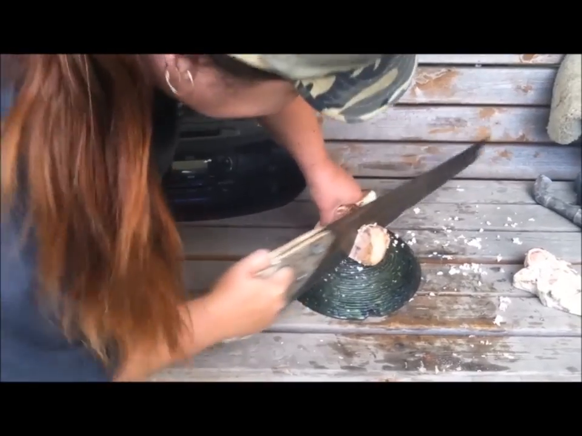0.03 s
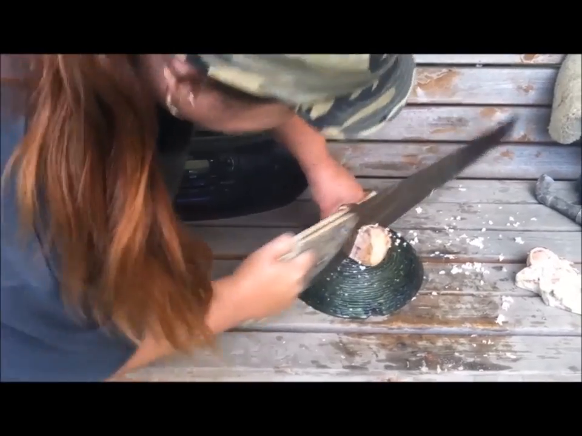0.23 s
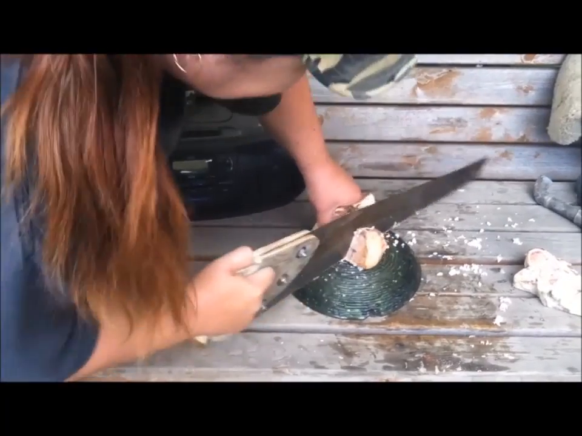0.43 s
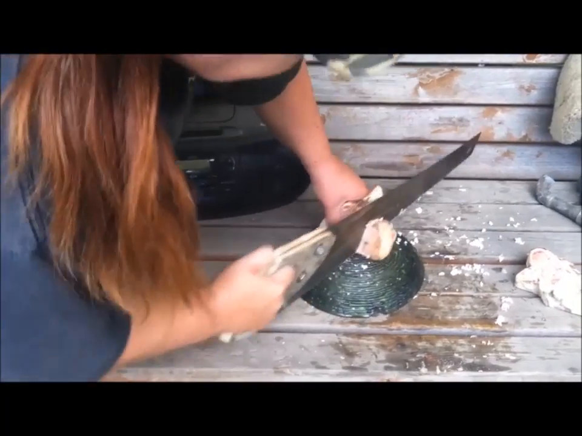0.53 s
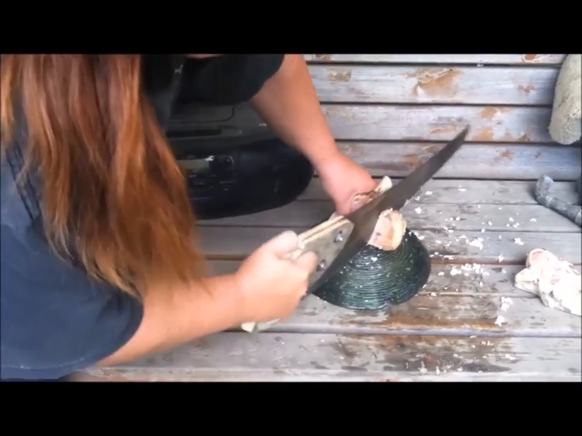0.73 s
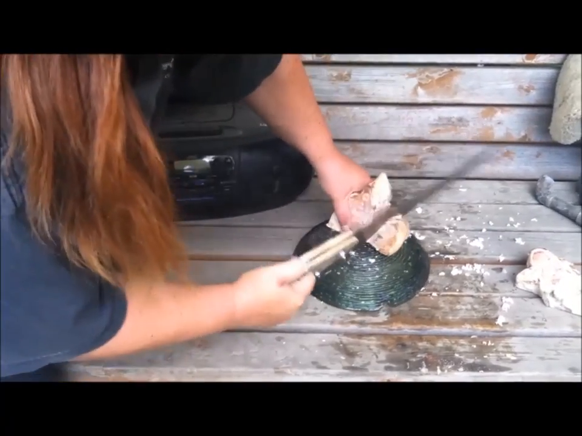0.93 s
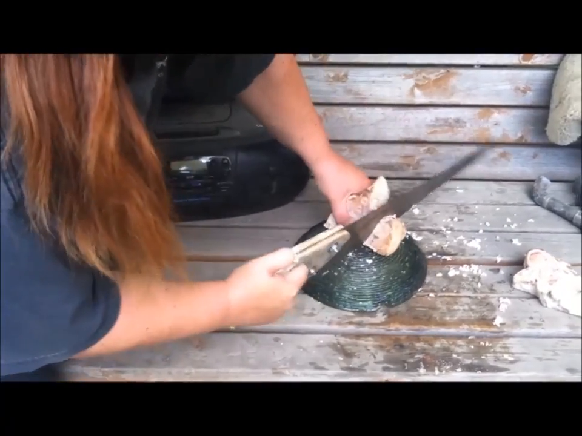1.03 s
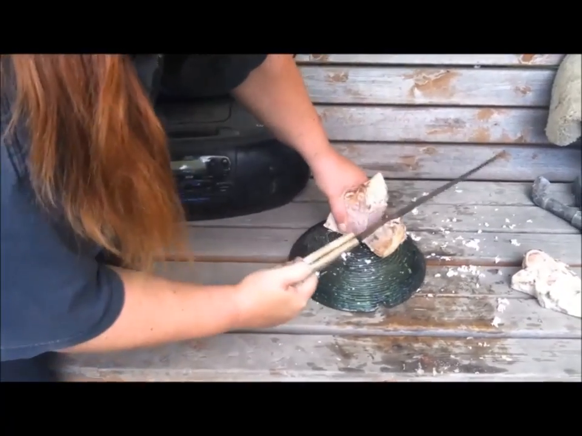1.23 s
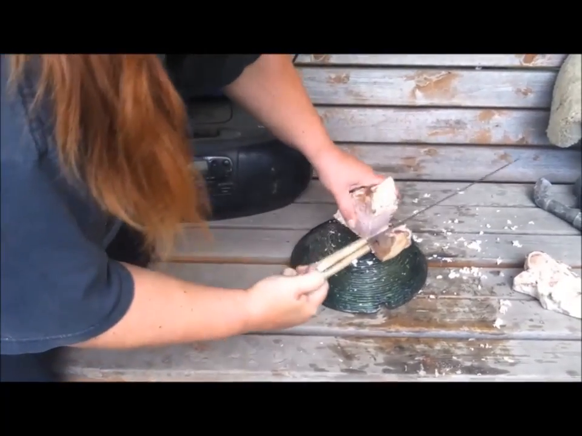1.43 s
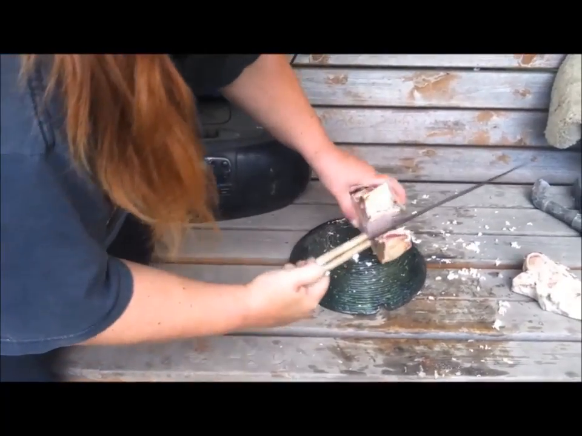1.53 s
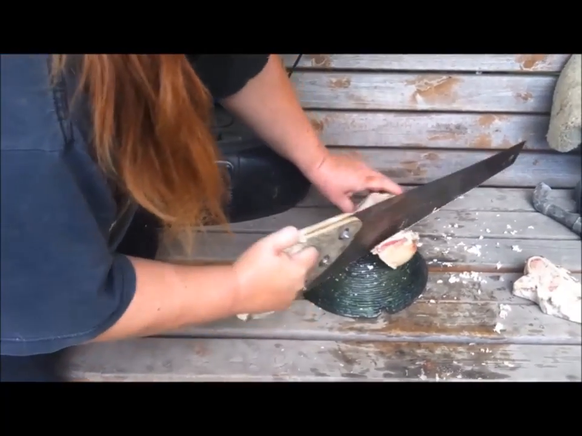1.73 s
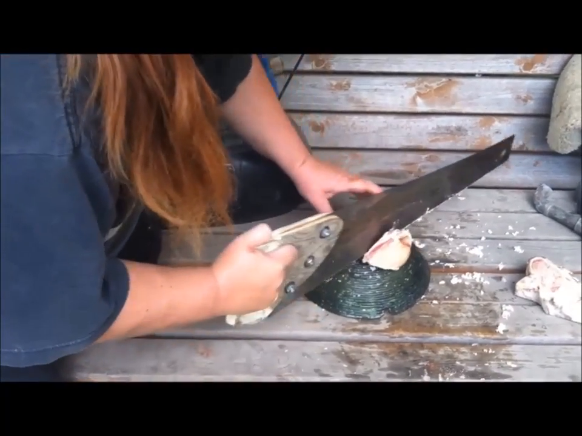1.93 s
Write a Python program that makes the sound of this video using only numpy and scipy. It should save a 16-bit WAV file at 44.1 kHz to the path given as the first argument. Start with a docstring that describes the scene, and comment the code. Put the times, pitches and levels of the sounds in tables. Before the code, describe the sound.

A handsaw rasps through frozen bone in three short strokes over the first 0.6 seconds, close by. The middle one catches hard near 0.3 seconds, with blade ringing, hollow knocks and groaning wood. The bone rocks and knocks again around 0.7 seconds, then snaps with a sharp double crack at about 1.1. A light blade scrape follows near 1.8 seconds, over soft outdoor air.

```python
"""First the hiss and scrape of a handsaw in frozen bone, close to one microphone in a quiet yard.
The teeth bite through three short strokes, the middle one hard and catching, and set the blade ringing.
The bone judders and knocks on its support while the wooden bench groans, then rocks as it is bent.
It snaps with a sharp double crack; a light scrape follows as the blade shifts, over soft outdoor air."""
import sys
import numpy as np
from scipy import signal
from scipy.fft import rfft, irfft
from scipy.io import wavfile
from scipy.ndimage import uniform_filter1d

SR = 44100
rng = np.random.default_rng(int(sys.argv[2]) if len(sys.argv) > 2 else 0)


def wav_record(signal):
    """Record a signal, one row per channel, as 16-bit PCM in the file named by sys.argv[1]."""
    frames = np.transpose(np.atleast_2d(signal))
    bounded = np.clip(frames, -1, 1)
    # unit amplitude maps onto the largest positive 16-bit level
    quanta = np.round(bounded * 32767).astype(np.int16)
    wavfile.write(sys.argv[1], SR, quanta)


N = 85995
T = np.arange(N) / SR

# Three strokes and a slip of the blade in the cut, one list each; all table levels are relative.
# Each row: time in seconds, hiss level in dB, scrape level in dB.
SAW_STROKES = [
    [(0.0, -36, -34), (0.014, -41, -45.5), (0.034, -38, -42), (0.052, -38, -34.5), (0.086, -42.5, -44),
     (0.128, -62, -52.5), (0.15, -64, -74)],
    [(0.17, -58, -56.5), (0.2, -48, -42), (0.212, -37.5, -33), (0.224, -30.5, -33), (0.238, -30.5, -27),
     (0.272, -32, -35.5), (0.288, -30, -25), (0.324, -29, -28), (0.358, -47.5, -34.5), (0.39, -60, -58)],
    [(0.39, -60, -52), (0.406, -52, -52), (0.424, -42, -38.5), (0.456, -37, -38), (0.484, -40, -43),
     (0.53, -46.5, -44), (0.556, -58.5, -52), (0.575, -70, -46.5)],
    [(0.68, -85, -72), (0.692, -51.5, -66), (0.714, -69, -43), (0.74, -59.5, -59), (0.78, -63, -61.5),
     (0.88, -65.5, -63.5)],
]
# The bone dragging and the bench groaning, one list a movement, then the blade's last shift.
# Each row: time in seconds, level in dB.
DRAG_LEVELS = [
    [(0.0, -53.5), (0.04, -41.5), (0.09, -54), (0.13, -52.5), (0.19, -48.5), (0.24, -28), (0.27, -29),
     (0.315, -18.5), (0.36, -41), (0.395, -54), (0.44, -45.5), (0.475, -36), (0.51, -54.5), (0.6, -49.5)],
    [(0.625, -68), (0.665, -42.5), (0.712, -40.5), (0.745, -41), (0.765, -61), (0.8, -83), (0.835, -55.5),
     (0.9, -73.5)],
]
GROAN_LEVELS = [
    [(0.0, -72), (0.04, -55), (0.09, -51), (0.13, -50), (0.18, -55), (0.215, -32.5), (0.28, -34.5),
     (0.32, -20), (0.36, -43), (0.41, -61), (0.46, -38.5), (0.535, -45), (0.62, -61)],
    [(0.64, -54), (0.67, -39.5), (0.715, -41.5), (0.79, -60), (0.84, -59), (0.92, -71), (0.985, -54),
     (1.03, -78)],
]
SHIFT_LEVELS = [(1.75, -69), (1.772, -57.5), (1.796, -56), (1.808, -46.5), (1.853, -53.5), (1.885, -65),
                (1.95, -71)]
# The bone meeting its support. Each row: start in seconds, level in dB, rise time in seconds.
BONE_KNOCKS = [(0.024, -19, 0.0049), (0.147, -26, 0.0049), (0.237, -19, 0.0031), (0.300, -7, 0.0039),
               (0.313, -14, 0.0035), (0.319, -6, .004), (0.345, -19, 0.0027), (0.455, -23.5, 0.0016),
               (0.5629, -15.5, 0.0013), (0.586, -32.5, 0.0038), (0.686, -22.5, 0.0036),
               (0.706, -20.5, 0.0031), (0.733, -27.5, 0.0041)]
# Small ticks of bone, chips under the teeth and a crumb after the snap.
# Each row: start in seconds, level in dB.
BONE_TICKS = [(0.2265, -25), (0.2319, -25), (0.285, -26), (0.2992, -22), (0.3164, -22), (0.440, -31),
              (1.115, -40)]
# The bench giving, and the bone breaking. Each row: start in seconds, level in dB.
BENCH_THUMPS = [(0.2, -49), (0.326, -46), (0.562, -60)]
BONE_CRACKS = [(1.0679, -31.5), (1.0702, -13.5), (1.0752, -10.5)]

# How each object rings. Each row: frequency in Hz, level in dB, seconds to fall by 60 dB.
BLADE_MODES = [(838, -4, .14), (975, -5, .1), (1111, -7, .09), (1267, -5, .11), (1345, -5, .08),
               (1395, -6, .06), (1545, -7, .13), (1745, -1, .05), (1890, -6, .11), (1955, -9, .07),
               (2050, -16, .04), (2250, -13, .05), (3041, -15, .13)]
UPPER_BLADE_MODES = [(3540, 0, .014), (4350, 0, .012), (6790, -9, .06)]
SUPPORTED_BONE_MODES = [(250, -16, .025), (505, -13, .04), (550, -2, .06), (590, -2, .035), (659, -7, .06),
                        (838, -14, .05), (1087, -18, .036), (1267, -22, .03), (1420, -20, .025)]
BENCH_MODES = [(178, -3.5, .035), (228, 1, 0.03), (273, -2, 0.035), (335, -6, 0.045)]
FRACTURE_MODES = [(3820, -4, 0.0084), (4010, 1.5, 0.0047), (10450, 3, 0.011), (13300, 0.5, 0.012),
                  (14600, 6.5, 0.01)]
BROKEN_BONE_MODES = [(600, 2.5, 0.047), (629, -3, 0.057), (757, -0.5, 0.034), (1173, 1, 0.052),
                     (2753, -10, 0.07), (3630, -0.5, 0.054)]

# The tone of each noise. Each row: frequency in Hz, spectral level in dB.
HISS_SPECTRUM = [(500, -20), (2000, -27), (2750, -3), (3500, 3), (4400, 2.5), (4900, -1.5), (5600, -3.5),
                 (6700, -1), (8700, -1.5), (9350, -8), (10300, -0.5), (11500, 0.5), (12050, -8), (12800, 1),
                 (14800, 0), (16000, -10.5)]
SCRAPE_SPECTRUM = [(60, -64), (130, -15), (300, -19), (400, -34), (600, -4.5), (900, -1.5), (1400, -0.5),
                   (1800, -1.5), (2100, -7), (4000, -17), (14000, -33)]
AIR_SPECTRUM = [(25, -54), (58, -19.5), (76, -8), (260, -3), (516, -4), (624, -2.5), (1790, -6.5),
                (2220, -9.5), (7310, -13.5), (16000, -21.5)]
CRACK_SPECTRUM = [(60, -42), (300, -20.5), (650, -5), (1200, -5.5), (2400, -11), (3000, -19), (3600, -4),
                  (4300, 4.5), (4900, -14), (7500, 2.5), (10500, 4.5), (12100, 4.5), (14000, -10),
                  (16000, -22.5)]
SCATTER_SPECTRUM = [(60, -28), (170, -20), (430, -16.5), (640, 3.5), (950, -4.5), (1200, -9), (1600, -6.5),
                    (3700, -7.5), (4900, -13.5), (7000, -5), (10300, -8.5), (16000, -7.5)]
SHIFT_SPECTRUM = [(60, -25), (330, -5), (480, -16.5), (700, -2), (1080, 0.5), (1280, -4.5), (1600, -1.5),
                  (1950, -5.5), (2400, -19.5), (3700, -13.5), (5200, -21), (16000, -22.5)]

BITES_PER_S, PACE_JITTER, BITE_SPREAD_DB, CRUMBLE_S = 600, 0.38, 4, 0.0011
DULLING_DB_PER_S, DULLING_HZ = 54, 7940
THUMP_HZ, THUMP_RISE_S = 45, 0.0073
WALL_DELAY_S, HOLLOW_HZ, BAND_LIMIT_HZ = 0.0067, 405, 15750


def amp(db):
    return 10 ** (np.asarray(db) / 20)


def unit_rms(x):
    return x / np.sqrt(np.mean(x ** 2) + 1e-20)


def add(mix, start_s, sound):
    part = mix[round(start_s * SR):][:len(sound)]
    part += sound[:len(part)]


def colour(x, spectrum):
    """Causal filter of unit power gain with the given spectrum."""
    size = 8192
    hz, db = np.transpose(spectrum)
    bins_hz = np.fft.rfftfreq(size, 1 / SR)
    gain = unit_rms(amp(np.interp(np.log(bins_hz + 1), np.log(hz + 1), db)))
    cepstrum = irfft(np.log(gain))
    cepstrum[1:size // 2] *= 2  # fold to minimum phase
    cepstrum[size // 2 + 1:] = 0
    response = irfft(np.exp(rfft(cepstrum)))[:size // 2]
    return signal.fftconvolve(x, response)[:len(x)]


def envelope(movements, column=1):
    """Gain over time from one dB column; silent outside the movements."""
    return sum(amp(np.interp(T, rows[:, 0], rows[:, column], left=-np.inf, right=-np.inf))
               for rows in map(np.array, movements))


def ring(modes, tuning=1, alternate=False):
    """Dying sines of a struck object; driven from its far side, neighbouring modes swing opposite ways."""
    t = T[:SR // 4]
    polarity = -1 if alternate else 1
    return sum(polarity ** k * amp(db - 60 * t / t60) * np.sin(2 * np.pi * hz * tuning * t)
               for k, (hz, db, t60) in enumerate(modes))


def burst(t60):
    """Noise that falls by 60 dB in t60 seconds."""
    t = T[:SR // 3]
    return rng.standard_normal(len(t)) * amp(-60 * t / t60)


def soften(x, rise_s):
    """Gives a sound a soft start."""
    return x * (1 - np.exp(-(T[:len(x)] / rise_s) ** 2))


def drift(samples):
    """Random wander, smoothed over this many samples."""
    return unit_rms(uniform_filter1d(rng.standard_normal(N), samples))


def low_cut(x, hz=160):
    """Small objects radiate little bass."""
    return signal.sosfilt(signal.butter(7, hz, "highpass", fs=SR, output="sos"), x)


def teeth():
    """Unevenly spaced bites of unequal depth, each a tiny burst of crumbling bone."""
    pace = BITES_PER_S * np.exp(PACE_JITTER * drift(samples=150))
    onsets = np.diff(np.floor(np.cumsum(pace) / SR), prepend=0)
    depths = amp(BITE_SPREAD_DB * np.clip(rng.standard_normal(N), -2, 2))
    crumble = signal.lfilter([1], [1, -np.exp(-1 / (CRUMBLE_S * SR))], onsets * depths)
    return unit_rms((unit_rms(crumble) + 0.55) * rng.standard_normal(N))  # steady grit between bites


def rubbed(modes):
    """An object ringing under continuous, gritty friction."""
    return unit_rms(signal.fftconvolve(teeth(), ring(modes, alternate=True))[:N])


def steel(hiss):
    """The blade's dense upper modes give the hiss a metallic edge; a few ring out."""
    shimmer = ring(UPPER_BLADE_MODES)
    plate = burst(t60=0.03)[:len(shimmer)]
    response = amp(-4) * plate / np.linalg.norm(plate) + amp(-16) * shimmer / np.linalg.norm(shimmer)
    response[0] += 1  # the direct hiss
    return signal.fftconvolve(hiss, response / np.linalg.norm(response))[:N]


def saw():
    """The teeth hiss, duller as each stroke goes on, scrape and ring the blade; bits of bone tick."""
    bites = teeth()
    hiss = amp(1) * bites * envelope(SAW_STROKES)
    treble = signal.sosfiltfilt(signal.butter(2, DULLING_HZ, "highpass", fs=SR, output="sos"), hiss)
    for stroke in SAW_STROKES:
        times = [row[0] for row in stroke]
        cutting = (T >= times[0]) & (T < times[-1])
        from_middle_s = np.clip(T - np.mean(times), -0.1, 0.1)
        hiss += cutting * (amp(-DULLING_DB_PER_S * from_middle_s) - 1) * treble
    for start_s, db in BONE_TICKS:
        add(hiss, start_s, amp(db) * burst(t60=0.01))
    scrape = amp(-4) * colour(bites, SCRAPE_SPECTRUM) + amp(-3.5) * rubbed(BLADE_MODES)
    return steel(colour(hiss, HISS_SPECTRUM)) + scrape * envelope(SAW_STROKES, column=2)


def bone_drag():
    """The bone judders and drags on its support, its pitch wavering as the pressure changes."""
    speed = 1 + 0.017 * drift(samples=round(0.018 * SR))
    wavering = np.interp(np.cumsum(speed) / SR, T, rubbed(SUPPORTED_BONE_MODES))
    grit = colour(teeth(), SCRAPE_SPECTRUM)
    return (amp(3.5) * wavering + amp(-13) * grit) * envelope(DRAG_LEVELS)


def bench():
    """The boards groan under the work and thump when the load changes."""
    boards = amp(-2) * low_cut(rubbed(BENCH_MODES) * envelope(GROAN_LEVELS))
    t = T[:SR // 4]
    thump = t / THUMP_RISE_S * np.exp(1 - t / THUMP_RISE_S) * np.sin(2 * np.pi * THUMP_HZ * t)
    for start_s, db in BENCH_THUMPS:
        add(boards, start_s, amp(db) * thump)
    return boards


def air():
    """Quiet, steady outdoor air around the microphone."""
    return amp(-60) * unit_rms(colour(rng.standard_normal(N), AIR_SPECTRUM))


def bone_knocks():
    """The bone rocks against its support, each contact a dull, hollow clack."""
    rings, grit = np.zeros(N), np.zeros(N)
    for start_s, db, rise_s in BONE_KNOCKS:
        knock = soften(ring(SUPPORTED_BONE_MODES, tuning=rng.normal(1, 0.0096)), rise_s)
        add(rings, start_s, amp(db - 3) * knock / abs(knock).max())
        add(grit, start_s, amp(db - 15) * soften(burst(t60=0.018), rise_s))
    lowpass = signal.butter(2, 1500, fs=SR, output="sos")
    return rings + signal.sosfiltfilt(lowpass, colour(grit, SCRAPE_SPECTRUM))


def snap():
    """A small tick, then two bright fractures ring the bone and scatter from the boards nearby."""
    cracks = np.zeros(N)
    fracture_ring = soften(ring(FRACTURE_MODES), rise_s=0.00044)
    bone_ring = soften(ring(BROKEN_BONE_MODES), rise_s=0.0051)
    for start_s, db in BONE_CRACKS:
        crack = colour(soften(burst(t60=0.0095), rise_s=0.0003), CRACK_SPECTRUM)
        scatter = colour(soften(burst(t60=0.16), rise_s=0.00079), SCATTER_SPECTRUM)
        add(cracks, start_s, amp(db) * crack)
        add(cracks, start_s, amp(db - 4.5) * fracture_ring)
        add(cracks, start_s, amp(db - 13) * scatter)
        add(cracks, start_s, amp(db - 13.5) * bone_ring)
    return cracks


def blade_shift():
    """The teeth slide lightly over the bone."""
    return amp(1.5) * colour(teeth() * envelope([SHIFT_LEVELS]), SHIFT_SPECTRUM)


def yard(direct):
    """Short scatter from the boards and a near wall reaches the microphone just behind the sound."""
    tail = burst(t60=0.13)
    scatter = signal.fftconvolve(direct, tail / np.linalg.norm(tail))[:N]
    heard = direct.copy()
    add(heard, WALL_DELAY_S, amp(-20) * scatter)
    return heard


def hollow(x):
    """A broad, partial dip hollows out the sound around 405 Hz."""
    return x - 0.45 * signal.lfilter(*signal.iirpeak(HOLLOW_HZ, Q=3, fs=SR), x)


def scene():
    """The work at the bench, the snap and the open air, from one close position in mono."""
    work = low_cut(saw() + bone_drag() + bone_knocks() + blade_shift()) + bench()
    return (hollow(yard(work)) + snap() + air())[None]


def record(dry):
    """The recorder's band limit takes the top off the microphone signal."""
    lowpass = signal.firwin(511, BAND_LIMIT_HZ, window=("kaiser", 9), fs=SR)
    return signal.oaconvolve(dry, lowpass[None], "same")


dry = scene()
out = record(dry)
wav_record(out)
```